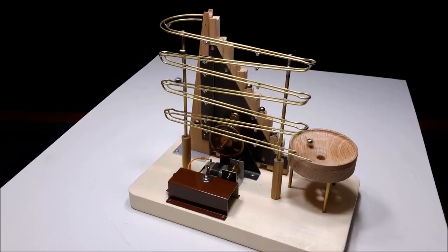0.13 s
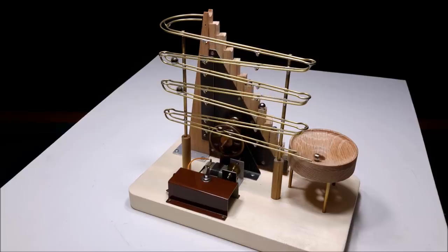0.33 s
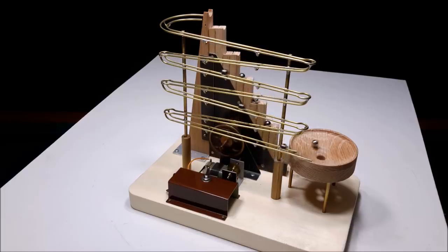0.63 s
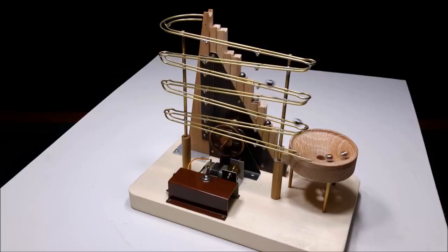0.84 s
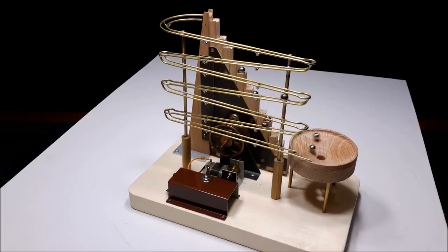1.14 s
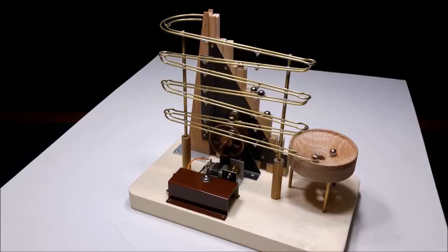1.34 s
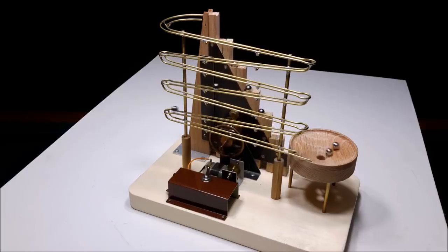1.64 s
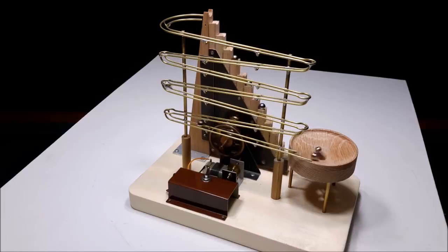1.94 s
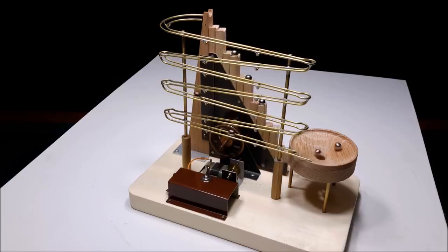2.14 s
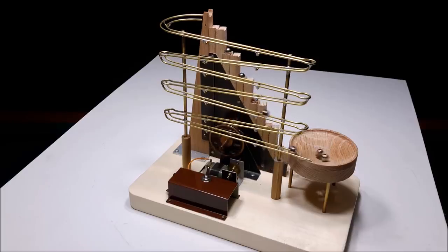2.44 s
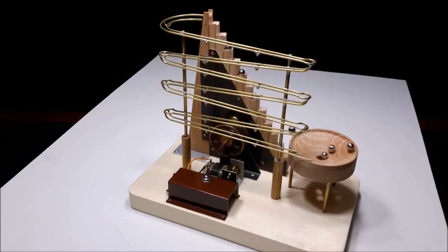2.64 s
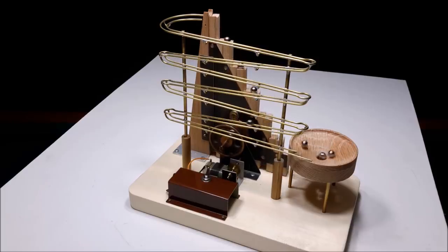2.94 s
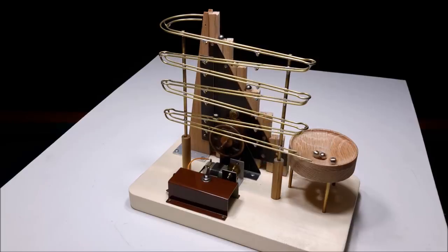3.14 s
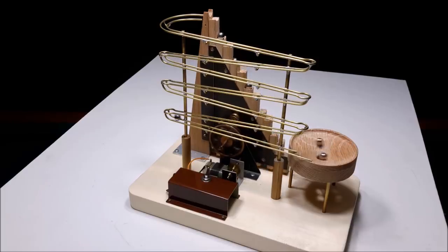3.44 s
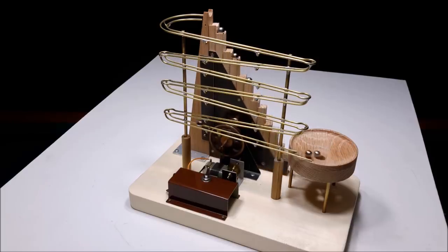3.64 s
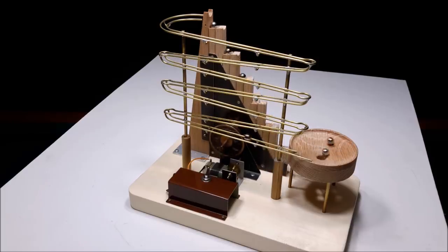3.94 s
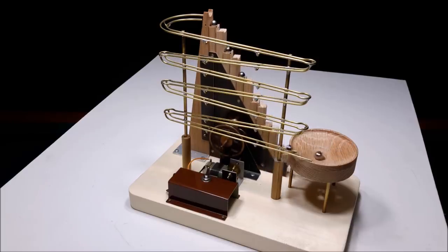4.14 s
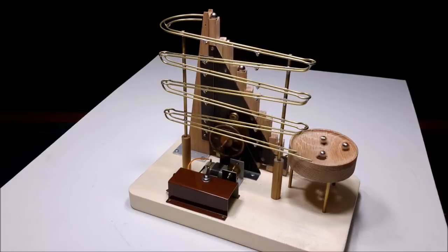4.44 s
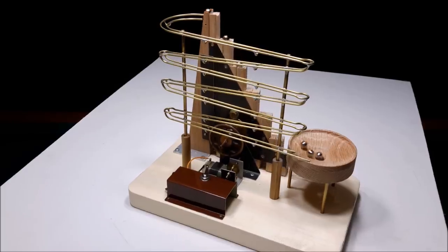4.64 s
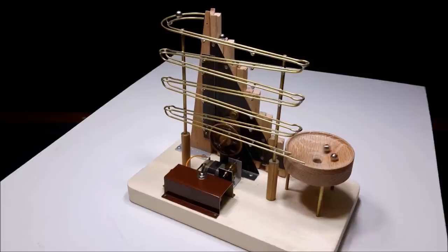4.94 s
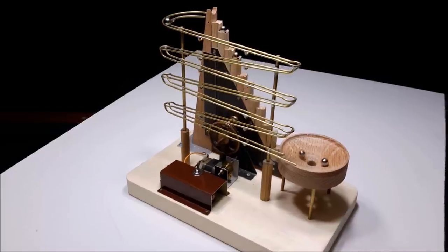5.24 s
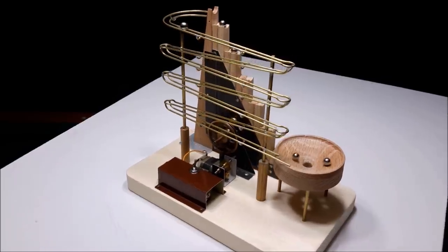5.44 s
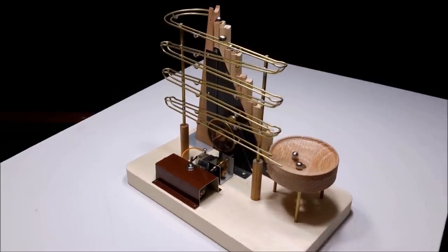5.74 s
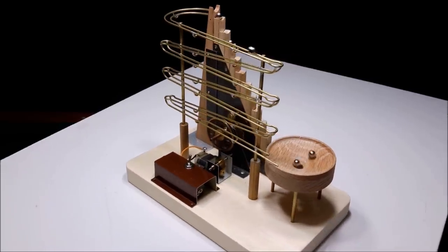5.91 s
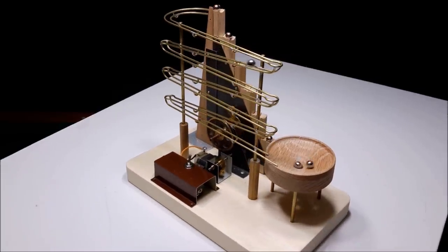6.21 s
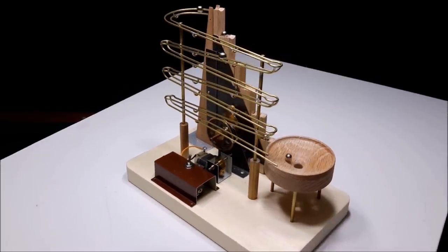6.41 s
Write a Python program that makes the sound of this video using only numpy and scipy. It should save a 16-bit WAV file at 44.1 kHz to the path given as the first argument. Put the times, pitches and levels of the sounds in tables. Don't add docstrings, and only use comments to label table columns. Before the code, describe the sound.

Thin motor whine with singing gears runs throughout, rising and sagging irregularly. Over it, balls land on metal wires in splashy chatters, frequent at first and sparser later, with rolling that swells and fades. Wooden ticks and hard steel clicks scatter between, bunching around the middle. Near the end the gear hum changes colour and two faint low knocks sound. Close and bright, little room echo, slightly watery noise.

```python
import sys
import numpy as np
from scipy import signal
from scipy.fft import rfft, irfft, next_fast_len
from scipy.io import wavfile
from scipy.ndimage import uniform_filter1d, map_coordinates

SR = 44100
rng = np.random.default_rng(int(sys.argv[2]) if len(sys.argv) > 2 else 0)


def persist_wave(psi):
    counts = np.round(np.clip(psi, -1, 1) * 32767).astype(np.int16)
    wavfile.write(sys.argv[1], SR, np.atleast_2d(counts).T)


def rack_gain(trim_db):
    fader = np.asarray(trim_db, float)
    return 10 ** (fader / 20)


N = 289737
TIME = np.arange(N) / SR

POLE_LEVELS = [-5.5, 0, -6]
# (frequency [Hz], width [Hz], level [dB])
CAN_MODES = [(4190, 220, -3), (4440, 260, 0), (4760, 170, 1.3), (4960, 250, -7)]
# (shaft order [per turn], level [dB])
GEAR_ORDERS = [(3, 2), (4, -6), (6, -10), (7, -5), (8, -3), (9, -8), (10, -6), (14, -2), (16, -2), (19, -4),
               (20, -4), (21, 0), (22, -2), (23, -1), (24, -4), (27, -5), (28, -5), (33, -5)]
# (frequency [Hz], width [Hz], level [dB])
GEAR_HUM = [(690, 8, -6), (1152, 6, 4), (1250, 14, -5), (1690, 12, -3), (1807, 9, 2), (2102, 8, -2),
            (2256, 11, 4), (2557, 10, -1), (2720, 12, -3), (3200, 14, -3)]
# (frequency [Hz], width [Hz], level [dB])
SIDE_HUM = [(725, 18, 1), (1172, 15, 3), (1695, 14, 5), (1770, 23, 8), (1812, 20, 11), (2160, 20, -12),
            (2350, 26, 3.5), (2600, 16, -3)]
# (time [s], level [dB])
FACING = [(0, -48), (2.8, -48), (5.5, -49), (5.95, -55), (6.57, -53)]
# (swings [per cam turn], depth [turns/s], fastest at [s])
CAM_SWINGS = [(1, 4.68, .884), (2, 5.35, .33), (3, .75, .28)]
# (time [s], speed change [turns/s])
BALL_LOAD = [(0, -.5), (.65, .7), (1.08, -1.8), (1.8, 1.2), (2.05, .2), (2.5, .7), (3.1, .3), (3.9, -.9),
             (4.7, 1), (5.5, -.2), (6.2, 1.3), (6.57, -2.8)]
# (time [s], speed change [turns/s], length [s])
BINDS = [(.11, -1.2, .03), (.25, -1.3, .07), (.59, -1, .025), (.74, .9, .05), (.85, -1.6, .05),
         (1.3, 1.4, .09), (1.96, -.7, .04), (2.12, 1.2, .07), (2.36, -.9, .08), (2.68, .6, .1),
         (2.95, -1.6, .04), (3.1, 1.2, .05), (3.41, .7, .04), (3.6, -.6, .14), (3.87, .5, .08),
         (4.03, -1, .06), (4.23, 1.1, .1), (4.57, -1.9, .07), (4.72, 1.3, .05), (5.07, .8, .05),
         (5.18, -.5, .05), (5.33, 1.1, .035), (5.43, -.5, .05), (5.55, .8, .03), (5.68, -.4, .08),
         (5.9, 1.5, .09), (6.15, -.4, .06), (.03, -.8, .05), (.31, -.4, .04), (1, -.35, .08),
         (1.82, .4, .05), (2.24, -.4, .04), (2.43, .4, .03), (3.2, -1, .05), (3.75, -.5, .03),
         (4.02, .6, .02), (4.1, -.5, .04), (4.5, -.5, .05), (5.8, .8, .03), (5.9, -.6, .03)]

# (time [s], level [dB])
TRAFFIC = [(0.0, -44), (0.84, -46), (1.11, -38.5), (1.28, -39), (1.41, -47), (1.65, -49), (1.92, -44.5),
           (2.4, -45), (2.78, -39), (3.0, -47), (3.29, -51.5), (3.6, -39), (3.79, -50.5), (4.4, -42),
           (4.76, -49.5), (5.65, -50), (5.97, -44.5), (6.57, -51)]
# (time [s], level [dB])
BASE_PRESSURE = [(0, 0.5), (.3, -1.5), (.4, -8.5), (1.05, 3), (1.17, -7), (1.4, -0.5), (1.6, 1), (2, -0.5),
                 (2.75, 1), (3.05, 1), (3.55, 2), (3.8, -1.5), (4.5, -2.5), (4.9, 2.5), (5.45, 2.5),
                 (5.95, -3.5), (6.57, 1.5)]
# (frequency [Hz], width [Hz], level [dB])
BOARD_MODES = [(227, 13.6, -1.5), (305, 9, -7), (1241, 130, -8.5), (1400, 1060, -14.5)]
# (frequency [Hz], width [Hz], level [dB])
BOWL_MODES = [(1824, 188, -5.5), (2073, 93, -5.5), (2287, 164, -0.5), (2490, 240, -6.5), (2677, 85, -2.5),
              (3180, 910, -4.5), (3600, 1000, -3.5)]
# (frequency [Hz], width [Hz], level [dB])
RAIL_MODES = [(4440, 1000, 14), (7297, 57, 24.5), (7910, 32, 13), (8050, 300, -19), (7960, 600, 15.5),
              (9850, 1600, 9.5), (11550, 610, 6)]

# (time [s], peak [dB], edge level [dB], t60 [s], wood pitch [Hz])
LANDINGS = [(0.147, -24.5, -9, 0.15, 2110), (0.446, -21, -10, 0.19, 2600), (1.104, -22.5, -10, 0.17, 2830),
            (1.203, -21.5, -8, 0.19, 3250), (1.8775, -23.5, -9.5, 0.12, 2230),
            (2.131, -23, -13, 0.15, 2450), (2.7769, -24.5, -11.5, 0.29, 2350),
            (3.5929, -26.5, -10, 0.19, 2135), (4.301, -34.5, -16, 0.17, 2200),
            (4.915, -33, -35, 0.26, 2360), (5.1897, -26, -33, 0.2, 2240), (6.2168, -23.5, -21, 0.13, 3180),
            (6.501, -33, -31.5, 0.22, 3200)]
# (first [Hz], second [Hz])
FAVOURED_PARTS = [(8683, 2740), (8166, 9238), (8161, 3165), (8543, 3160), (7978, 2665), (8150, 5190),
                  (8656, 5905), (8683, 8134), (8160, 7420), (8160, 8690), (8160, 8545), (12037, 13000),
                  (9200, 6800)]
# (frequency [Hz], width [Hz], level [dB])
STRUCK_WIRES = [(5180, 30, -13), (6035, 40, -15), (5905, 20, -12), (7200, 50, -7), (7420, 28, -2),
                (7640, 40, -7), (7910, 40, -2), (8158, 36, 2), (8300, 1400, -13), (8370, 40, -5),
                (8545, 30, -1), (8685, 40, -2), (9030, 60, -6), (9600, 700, -13)]
# (frequency [Hz], width [Hz], level [dB])
STRUCK_FRAME = [(1150, 81, -1.5), (1234, 740, -5), (1875, 57, -0.5), (2269, 87, 6), (3180, 590, 2),
                (3960, 2800, -4.5)]
# (frequency [Hz], level [dB])
LANDING_EDGE = [(9000, 9), (10500, 18), (12500, 18), (13500, -19), (15500, -17), (16300, -30)]

# (time [s], peak [dB], pitch [Hz])
BALL_CLICKS = [(1.107, -12, 8550), (1.111, -11, 8200), (1.2186, -15, 8900), (0.4626, -4, 8200),
               (0.147, -17, 8800), (2.7796, -5.5, 8900), (2.803, -23, 8300), (1.2165, -14, 8400),
               (.9475, -18.5, 8200), (1.104, -7, 8730), (1.2015, -5.5, 8300), (2.1337, -4.5, 8200),
               (2.877, -11, 7400), (2.907, -12.5, 7300), (2.949, -12.5, 7700), (2.9646, -25, 8200),
               (3.1621, -19, 7960), (3.387, -18, 8450), (3.393, -19, 8200), (3.4067, -20, 7970),
               (3.4343, -18, 7850), (3.4443, -22, 8200), (3.7335, -16, 7910), (3.7784, -25, 8400),
               (4.4494, -18, 8060), (4.464, -22, 8600), (5.062, -20, 7960), (5.2836, -16, 8070),
               (5.3277, -19, 8000), (5.364, -19.5, 8300), (6.2163, -8.5, 9080), (6.279, -12, 7640),
               (6.307, -22, 8200), (6.371, -19.5, 8700),
               (3.4917, -4, 8560), (3.5037, 0, 8000), (3.508, -10, 8850), (3.5356, -0.5, 8200),
           (3.549, -2, 8020), (3.556, -2, 8300), (3.5714, -10, 8400), (3.5818, -9, 8200),
           (3.594, -8.5, 8700), (3.609, -16, 8200), (5.153, 1, 8090), (5.176, -10, 7750),
           (5.189, 1.5, 8080), (5.2074, -9, 8200), (5.218, -7, 8200), (5.223, -7, 8230),
           (5.2334, -28, 8000)]
# (time [s], peak [dB], pitch [Hz], steel ring [dB])
STEP_TICKS = [(0.954, -35, 3030, -50), (0.9800, -23.5, 3000, -40), (0.9941, -22.5, 2810, -13),
              (1.0094, -38, 3650, -52), (1.111, -36, 1072, -50), (1.1563, -28, 2100, -42),
              (1.6628, -31, 3780, -20), (1.686, -35.5, 3350, -50), (2.4922, -32.5, 3180, -50),
              (2.7042, -25, 2870, -40), (2.7105, -28, 3000, -40), (2.8353, -25.5, 3000, -40),
              (2.8785, -24.5, 1810, -38), (2.909, -32, 1590, -21), (2.932, -38, 1400, -50),
              (2.9495, -36.5, 1770, -50), (3.271, -37, 3350, -43), (3.296, -34, 3480, -50),
              (3.3877, -37, 3730, -40), (3.4386, -32.5, 3830, -24), (3.557, -29, 3350, -42),
              (3.553, -37, 1530, -50), (3.7709, -31, 3370, -19.5), (4.117, -32, 4520, -16.5),
              (4.4201, -25.5, 2600, -13.5), (4.4323, -21.5, 2620, -13), (4.5597, -25.5, 2430, -7.5),
              (4.9536, -37.5, 3640, -50), (5.401, -31.5, 3600, -17), (5.7186, -38, 2820, -22),
              (5.7326, -35.5, 2480, -34), (6.4873, -34, 3300, -50)]
# (time [s], peak [dB])
STEP_NUDGES = [(0.838, -42), (0.877, -34), (1.9809, -36), (2.598, -45), (2.6803, -31), (4.156, -37),
               (4.2627, -37), (4.3281, -41), (4.4497, -26), (4.4754, -40), (4.594, -33), (4.6154, -28.5),
               (4.6996, -35), (5.277, -36), (6.5266, -53)]
# (frequency [Hz], level [dB], t60 [s])
STAIR_MODES = [(1395, -4, 0.025), (1835, -12, 0.044), (2281, -8.5, 0.1), (2770, -6, 0.044), (3257, 3, 0.02),
               (3680, 2.5, 0.024), (4175, -8.5, 0.09), (5100, 2, 0.014), (5700, 0, 0.018)]
# (time [s], peak [dB], pitch [Hz], t60 [s])
TABLE_KNOCKS = [
    (6.376, -50.5, 196.4, 0.17),
    (6.408, -41.5, 189, 0.15),
]
# (time [s], peak [dB], pitch [Hz], t60 [s])
POST_RINGS = [
    (3.552, -39.5, 1530, 0.16),
    (1.211, -39, 3160, 0.078),
    (1.113, -36, 1780, 0.11),
    (3.562, -41.5, 2250, 0.14),
    (4.436, -37, 3400, 0.17),
    (4.4, -35, 2380, 0.098),
]

# (frequency [Hz], t60 [s])
ROOM_DECAY = [(500, 0.08), (3000, 0.25), (9000, 0.04)]
# (frequency [Hz], level [dB per Hz])
AIR_HISS = [(12, -19), (20, -13), (49, -16.5), (164, -11), (450, -13), (1070, -16), (1780, -19.5),
            (3300, -11), (4400, -15), (6290, -17), (8100, -5), (16300, -66)]
# (time [s], depth [dB], length [s])
DROPOUTS = [(0.112, -16, 0.017), (0.243, -13, 0.017), (0.383, -19, 0.031), (0.421, -14, 0.015),
            (0.666, -16, 0.019), (0.751, -16, 0.014), (1.182, -36, 0.015), (1.218, -34, 0.013),
            (1.498, -17, 0.016), (1.777, -17, 0.015), (2.049, -25, 0.03), (2.991, -15, 0.015),
            (3.054, -21, 0.022), (3.379, -30, 0.016), (3.957, -12, 0.021), (4.741, -17, 0.02),
            (4.806, -14, 0.02), (5.108, -12, 0.02), (5.381, -19, 0.013), (5.871, -16, 0.017),
            (6.0, -18, 0.014), (6.232, -32, 0.013), (6.508, -20, 0.015), (4.49, -12, 0.02)]
SHALLOW_DROPOUTS = [1.546, 1.632, 1.804, 1.905, 3.104, 3.145, 3.211, 3.252, 3.337, 3.589, 3.638, 4.041,
                    4.11, 4.873, 4.917, 5.429, 5.599, 6.112, 6.391, 6.561]

SHAFT_HZ, CAM_S = 79.03, 1.633


def unit(x):
    return x / np.sqrt(np.mean(x ** 2) + 1e-20)


def along(points, hz):
    f, v = np.transpose(points)
    return np.interp(np.log(hz + 1), np.log(f + 1), v)


def curve(points):
    s, value = np.transpose(points)
    return np.interp(TIME, s, value)


def wobble(rate):
    coarse = TIME[::32]
    return np.interp(TIME, coarse, map_coordinates(rng.standard_normal(N // 100), [coarse * rate]))


def filtered(x, response):
    m = next_fast_len(len(x) + 8192)
    return irfft(rfft(x, m) * response(np.fft.rfftfreq(m, 1 / SR)), m)[:len(x)]


def ringing(x, modes):
    def body(f):
        total = 0
        for k, (centre, width, db) in enumerate(modes):
            damping = 1j * f * width
            total = total + (-1) ** k * rack_gain(db) * damping / (centre * centre - f * f + damping)
        return total
    return unit(filtered(x, body))


def gritty(grit_db, rate):
    return rng.standard_normal(N) * rack_gain(grit_db * wobble(rate))


def blip(hz, t60, rise, glide=0):
    t, glide_s = TIME[:SR // 8], .001
    bent = t + glide * glide_s * (1 - np.exp(-t / glide_s))
    return np.sin(2 * np.pi * hz * bent) * rack_gain(-60 * t / t60) * (1 - np.exp(-(t / rise) ** 2))


def add(track, s, sound):
    at = track[round(s * SR):][:len(sound)]
    at += sound[:len(at)]


def shaft():
    coarse = TIME[::32]
    binds = sum(hz * np.exp(-((coarse - s) / length) ** 2) for s, hz, length in BINDS)
    drift = uniform_filter1d(curve(BALL_LOAD), size=4000)
    swing = sum(hz * np.cos(2 * np.pi * k * (TIME - s) / CAM_S) for k, hz, s in CAM_SWINGS)
    return SHAFT_HZ + np.interp(TIME, coarse, binds) + drift + swing


def commutator(count):
    snaps = np.zeros(N)
    for k in range(47, 74):
        level = rack_gain(POLE_LEVELS[k % 3] + 1.1 * wobble(8))
        snaps += level * np.cos(2 * np.pi * k * count + np.pi / 2 * (k % 3 != 1))
    brush = rng.standard_normal(N) * (1 + .4 * np.cos(6 * np.pi * count))
    can = unit(ringing(snaps, CAN_MODES) + .1 * ringing(ringing(brush, CAN_MODES), [(4550, 1500, 0)]))
    seam_hz, seam_width_hz = 4630, 90
    can = filtered(can, lambda hz: 1 - .75 / (1 + (2 * (hz - seam_hz) / seam_width_hz) ** 2))
    return ringing(can, [(4580, 1100, 0)])


def gear_train(count, faster_hz):
    turned = np.clip((TIME - 5.45) / .5 + .5, 0, 1)
    teeth = sum(rack_gain(db + 2 * wobble(5)) * np.sin(2 * np.pi * k * count) for k, db in GEAR_ORDERS)
    teeth = rack_gain(-58 + .5 * faster_hz) * unit(teeth)
    front = rack_gain(-53.5) * (1 - .7 * turned) * ringing(rng.standard_normal(N), GEAR_HUM)
    side = rack_gain(-54.5) * turned * ringing(rng.standard_normal(N), SIDE_HUM)
    return teeth + front + side


def motor():
    speed = shaft()
    runout = .0045 * np.cos(2 * np.pi * .09975 * np.cumsum(speed) / SR + .36)
    count = np.cumsum(speed * (1 + runout)) / SR
    faster_hz = speed - SHAFT_HZ
    whine_db = curve(FACING) + 0.23 * faster_hz + 0.77 * wobble(1.91)
    return rack_gain(whine_db) * commutator(count) + gear_train(count, faster_hz)


def rolling():
    busy_db = curve(TRAFFIC) + 50
    board_db = -55.5 + 0.33 * busy_db + curve(BASE_PRESSURE)
    bowl_db = -55 + busy_db
    rails_db = -55.5 + 1.06 * busy_db
    board = rack_gain(board_db + .8 * wobble(9)) * ringing(gritty(1.2, 40), BOARD_MODES)
    bowl = rack_gain(bowl_db + 1.53 * wobble(12)) * ringing(gritty(0.81, 150), BOWL_MODES)
    wires = ringing(ringing(gritty(2.0, 200), RAIL_MODES), [(8200, 41000, 0)])
    return board + bowl + rack_gain(rails_db + 0.95 * wobble(22.6)) * wires


def vary(modes):
    return [(hz, width, db + 2 * rng.standard_normal()) for hz, width, db in modes]


def drops():
    out, t = np.zeros(N), TIME[:SR // 3]
    for (s, db, edge_db, t60, wood_hz), parts in zip(LANDINGS, FAVOURED_PARTS):
        bounce = uniform_filter1d(rng.standard_normal(len(t)), 40) * 40 ** .5
        chatter = rng.standard_normal((3, len(t))) * rack_gain(2.2 * bounce)
        wire_modes = vary(STRUCK_WIRES) + [(hz, 34, -0.5) for hz in parts]
        wires = unit(ringing(chatter[0], wire_modes) + 0.2 * ringing(chatter[0], RAIL_MODES))
        wood = ringing(chatter[1], vary(STRUCK_FRAME) + [(wood_hz, 50, -1)])
        frame = rack_gain(-2.5 + 0.16 * s) * wood * (1 - np.exp(-t / .004))
        edge = unit(filtered(chatter[2], lambda hz: rack_gain(along(LANDING_EDGE, hz))))
        edge = rack_gain(edge_db) * edge * rack_gain(-25 * t / t60)
        envelope = rack_gain(-60 * (t / t60) ** 1.63) * (1 + 2.3 * np.exp(-t / 0.0016))
        add(out, s, rack_gain(db - 9.5) * (wires + frame + edge) * envelope)
    return out


def snap(db, hz):
    a, b, c = rng.uniform(size=3)
    sound = blip(hz, .005, .0008)
    sound += .3 * blip(hz * (.92 + .04 * a), .008, .0007)
    sound += .25 * blip(hz * (1.05 + .07 * b), .006, .0006)
    sound += 0.006 * blip(13000 + 2500 * c, .004, .0003)
    sound += 0.03 * blip(10200 + 2000 * a, 0.0061, 0.00034)
    sound += 0.03 * blip(3500 + 2500 * b, 0.004, 0.0004)
    echo = np.pad(sound, (round((.0022 + .0008 * c) * SR), 0))[:len(sound)]
    return rack_gain(db + 1.5) * (sound + rack_gain(-12 - 2.4 * a) * echo)


def clicks():
    out = np.zeros(N)
    steps = [(s, db, 8200 + 250 * rng.standard_normal()) for s, _, _, db in STEP_TICKS]
    for s, db, hz in BALL_CLICKS + steps:
        add(out, s, snap(db, hz))
    return out


def staircase(hz):
    out = 0
    for mode_hz, level, t60 in STAIR_MODES:
        u, v = rng.standard_normal(2)
        level_db = -4.5 + level + 2.5 * u - 7 * abs(np.log2(mode_hz / hz))
        out = out + rack_gain(level_db) * np.sign(v) * blip(mode_hz * (1 + v / 100), t60, .0015)
    return out


def ticks():
    out, t = np.zeros(N), TIME[:SR // 8]
    rows = [(s, db, hz, 2 if hz < 3060 else -20) for s, db, hz, _ in STEP_TICKS]
    rows += [(s, db, 2205, -2) for s, db in STEP_NUDGES]
    for s, db, hz, bright_db in rows:
        crack = rng.standard_normal(len(t))
        for _ in range(3):
            crack = ringing(crack, [(3000, 1560, 0)])
        crack = crack * rack_gain(-60 * t / .02) * (1 - np.exp(-t / .0004))
        pitched = blip(hz, .016 * max(1, 2200 / hz) ** 2, .0004, glide=.3)
        bright = blip(4900 + 300 * rng.uniform(), .005, .0005)
        tick = .4 * crack + .85 * pitched + staircase(hz) + rack_gain(bright_db + 2) * bright
        add(out, s, rack_gain(db + 0.5) * tick)
    return out


def bumps():
    out = np.zeros(N)
    for s, db, hz, t60 in TABLE_KNOCKS:
        knock = blip(hz, t60, .003) + .6 * blip(1.9 * hz, t60, .002) + .3 * blip(4.05 * hz, 1.5 * t60, .003)
        add(out, s, rack_gain(db + 1.5) * knock)
    for s, db, hz, t60 in POST_RINGS:
        add(out, s, rack_gain(db) * blip(hz, t60, .003))
    return out


def room(x):
    hz, t, z = signal.stft(rng.standard_normal(SR // 3), SR, nperseg=256)
    decay = rack_gain(-60 * t / along(ROOM_DECAY, hz)[:, None])
    tail = signal.istft(z * decay, SR, nperseg=256)[1]
    return signal.fftconvolve(np.pad(x, (130, 0)), tail / np.linalg.norm(tail))[:N]


def hiss():
    air = unit(filtered(rng.standard_normal(N), lambda hz: rack_gain(along(AIR_HISS, hz))))
    whistle = ringing(rng.standard_normal(N), [(11400, 730, -4), (14000, 1500, -16), (15400, 790, -28)])
    return rack_gain(-48.0) * air + rack_gain(-83.0) * whistle


def scene():
    hits = clicks() + ticks() + bumps()
    mix = motor() + rolling() + drops() + hits + rack_gain(-14) * room(hits) + hiss()
    return mix[None]


def thrifty(x, keep_db, lift_db, fill_db):
    z = signal.stft(x, nperseg=1536, noverlap=1152)[2]
    size = np.abs(z) / (uniform_filter1d(np.abs(z), 80, 0) + 1e-9) ** .66
    over = (size / (rack_gain(keep_db) * size.max(0) + 1e-9)) ** 24
    strong = signal.istft(z * over / (1 + over), nperseg=1536, noverlap=1152)[1][:N]
    hole_db, near = np.zeros(N), np.zeros(N)
    for s, db, length in DROPOUTS + [(s, -11, .017) for s in SHALLOW_DROPOUTS]:
        hole_db += 1.12 * db * np.interp((TIME - s) / length, [-.75, -.15, .2, .6], [0, 1, 1, 0])
        near += np.exp(-((TIME - s) / (.01 + length)) ** 2)
    return rack_gain(lift_db * np.minimum(near, 1)) * strong + rack_gain(fill_db + hole_db) * (x - strong)


def low_pass(x):
    return signal.sosfilt(signal.butter(12, 16480, fs=SR, output="sos"), x)


def record(dry):
    thinned = thrifty(dry[0], keep_db=-6.5, lift_db=3.5, fill_db=-2)
    limited = filtered(thinned, lambda hz: hz < 16250)
    return low_pass(limited[None] - .0006)


dry = scene()
out = record(dry)
persist_wave(out)
```